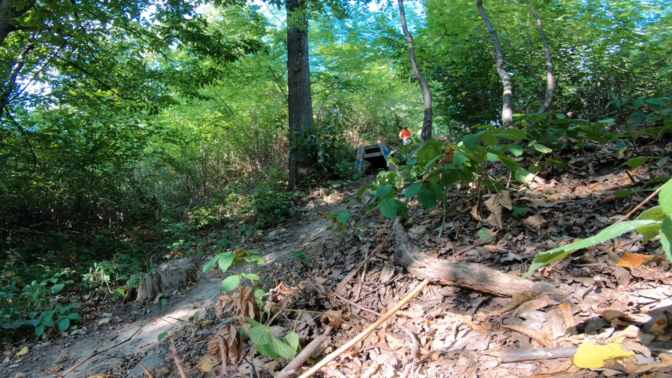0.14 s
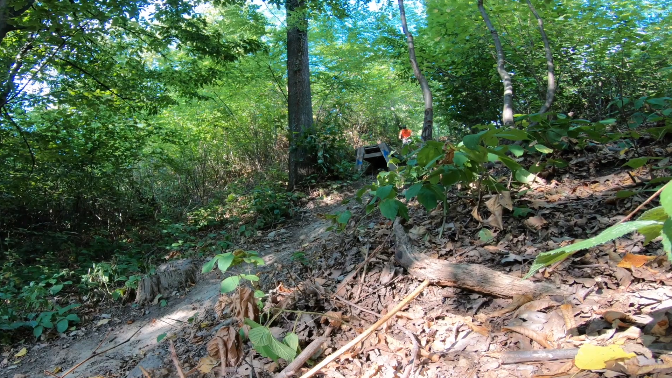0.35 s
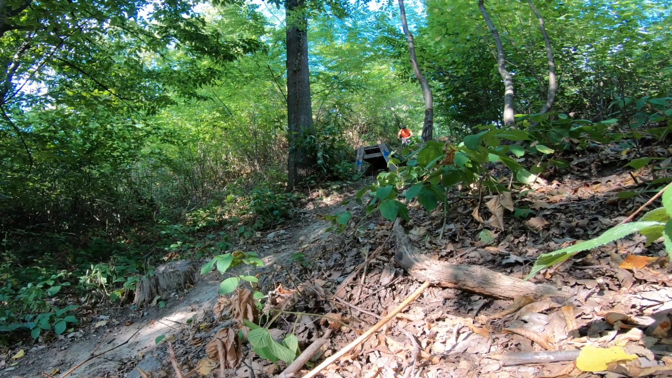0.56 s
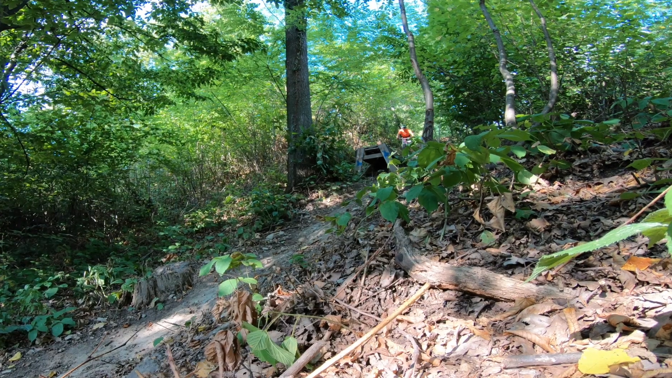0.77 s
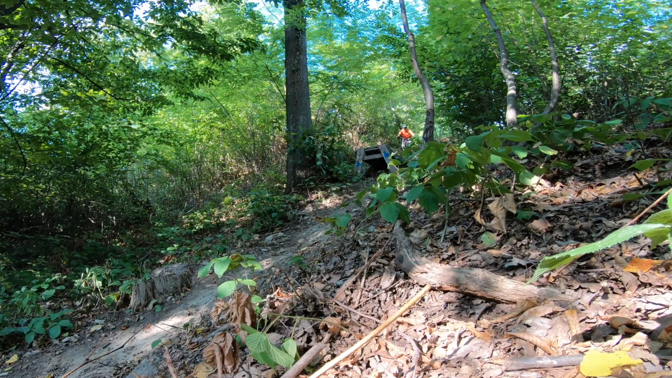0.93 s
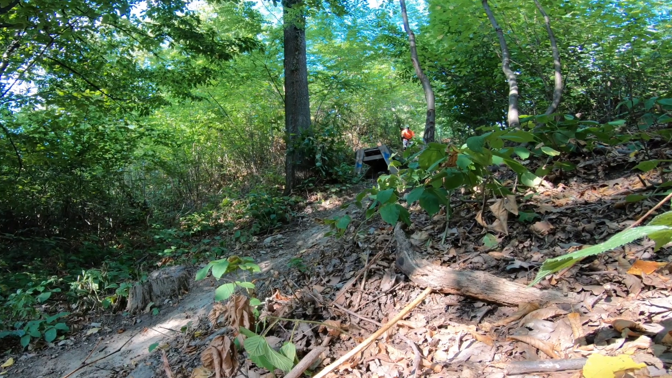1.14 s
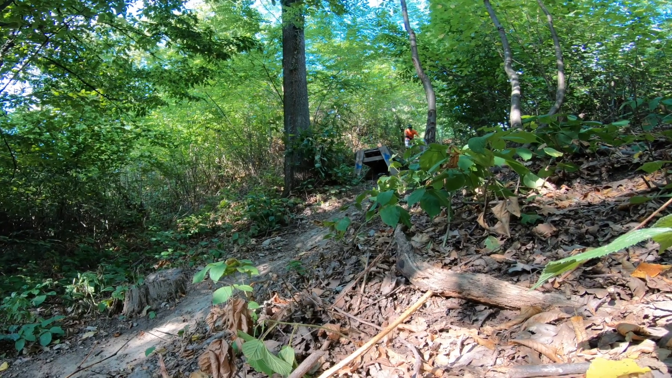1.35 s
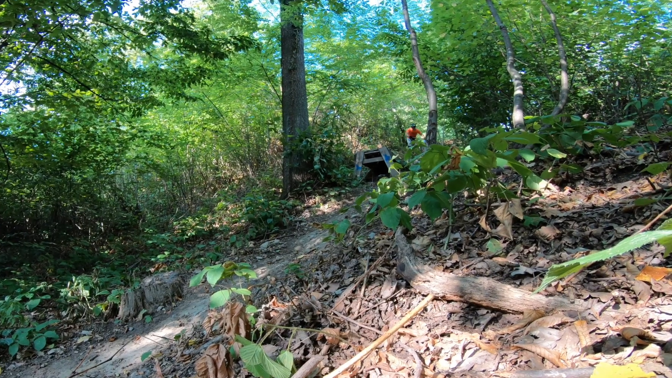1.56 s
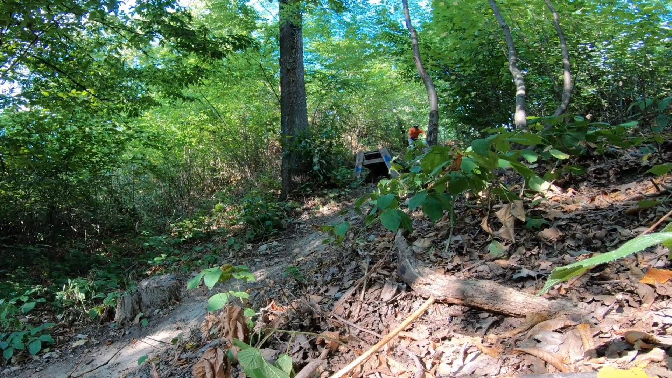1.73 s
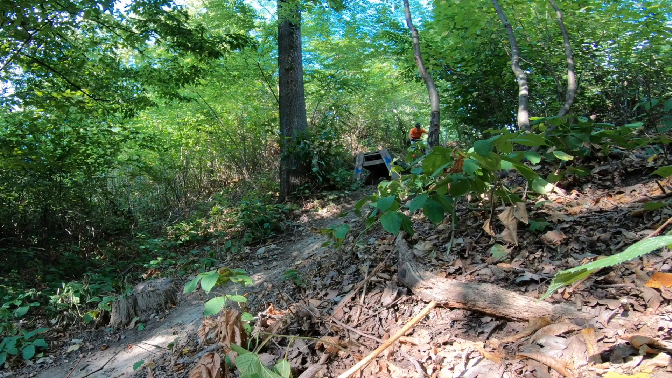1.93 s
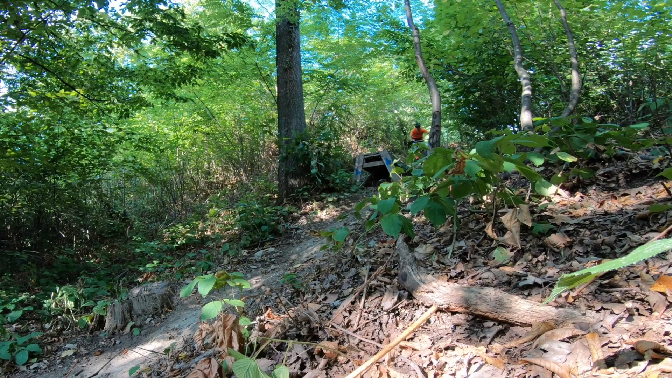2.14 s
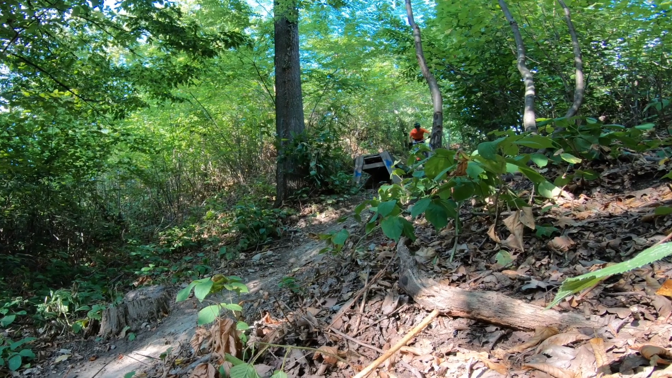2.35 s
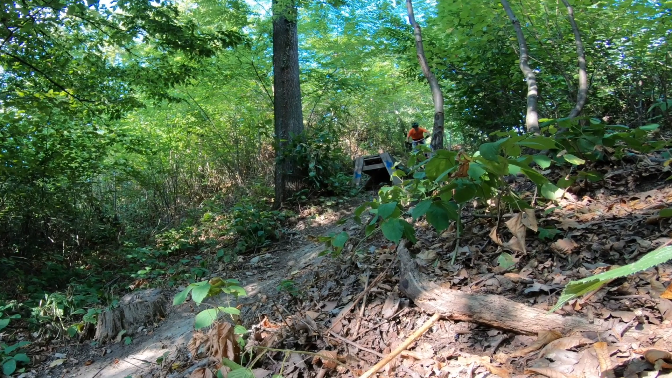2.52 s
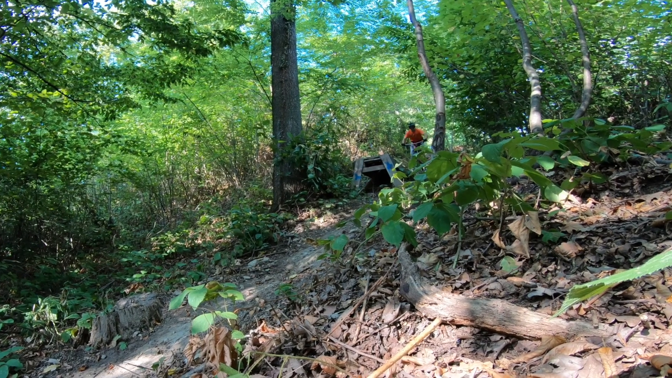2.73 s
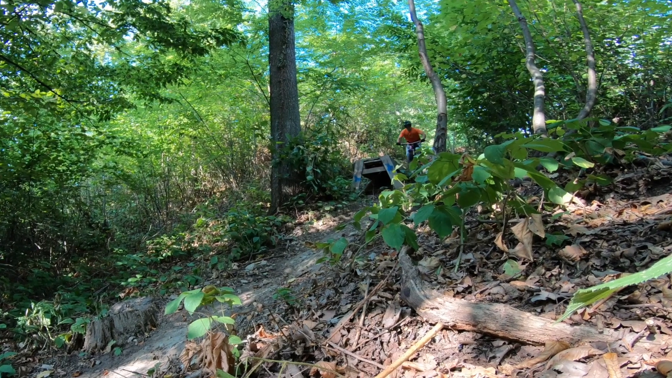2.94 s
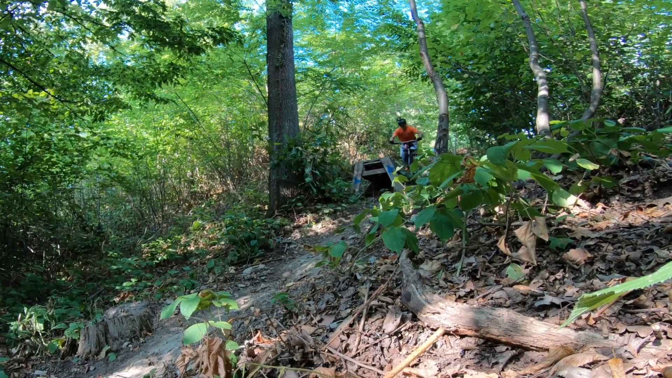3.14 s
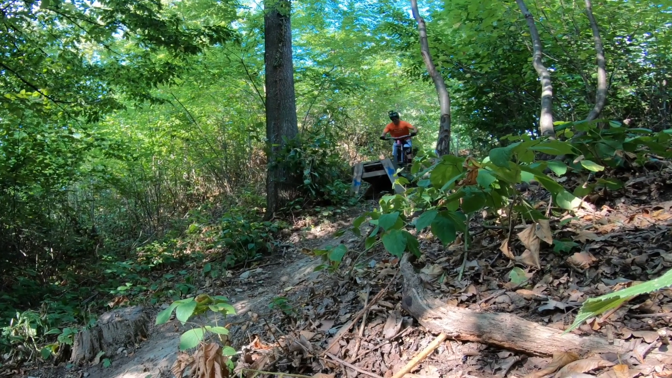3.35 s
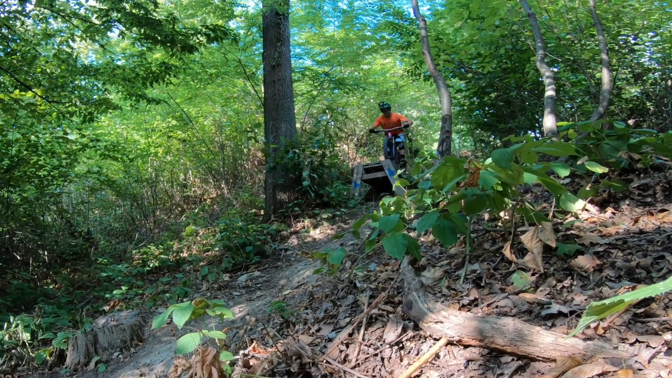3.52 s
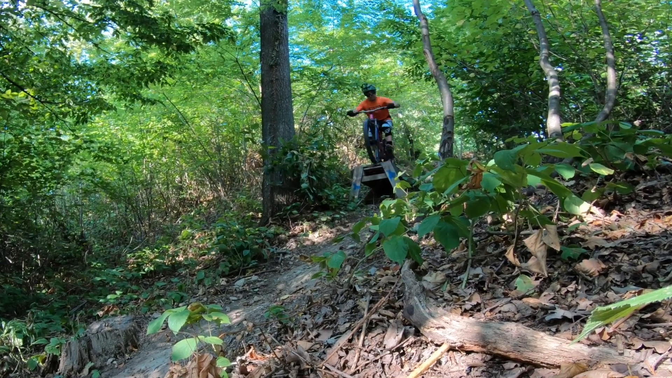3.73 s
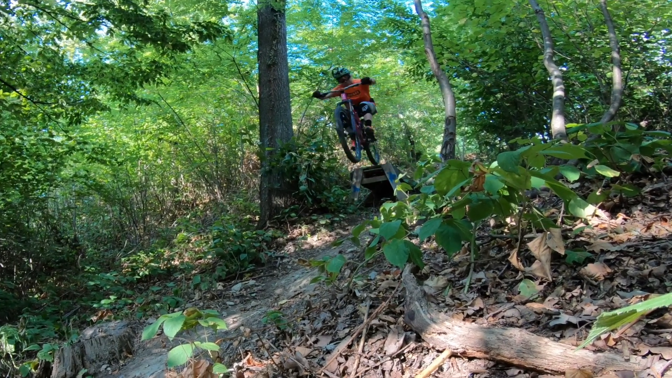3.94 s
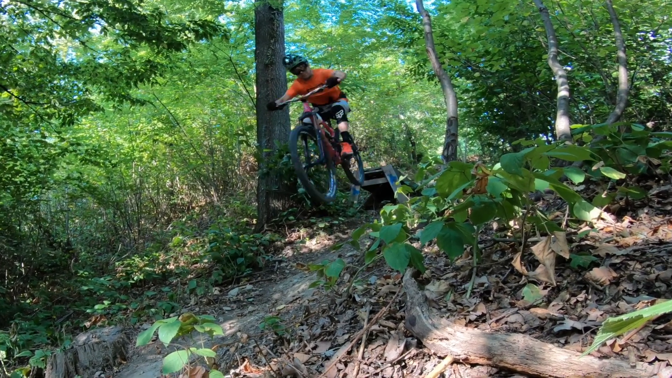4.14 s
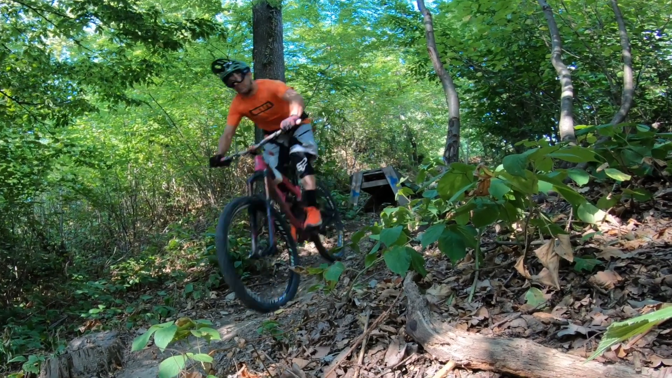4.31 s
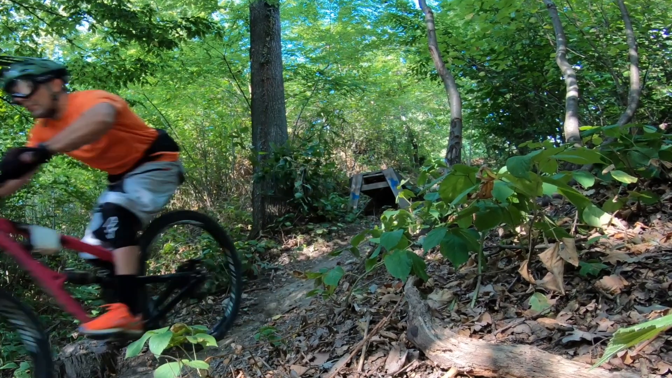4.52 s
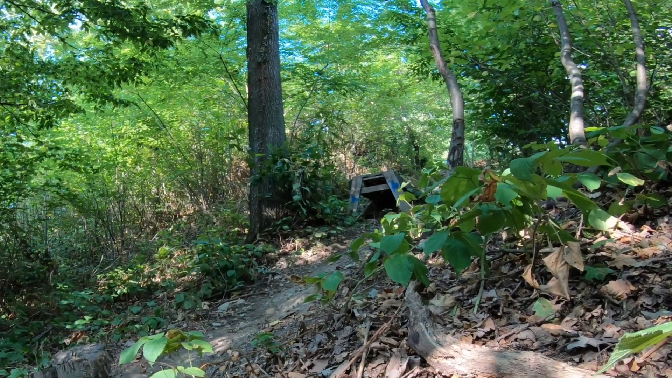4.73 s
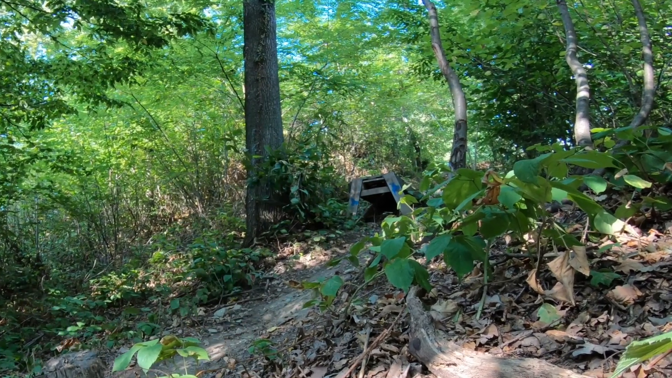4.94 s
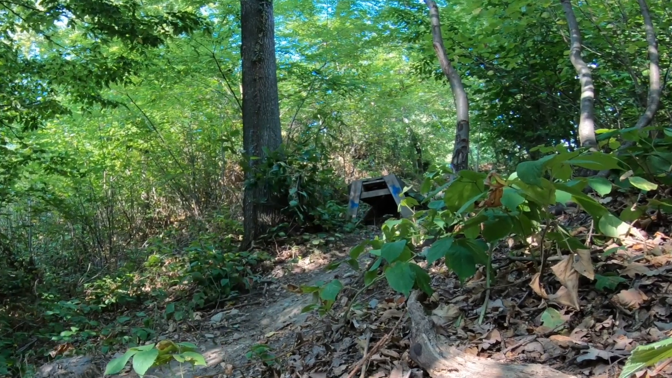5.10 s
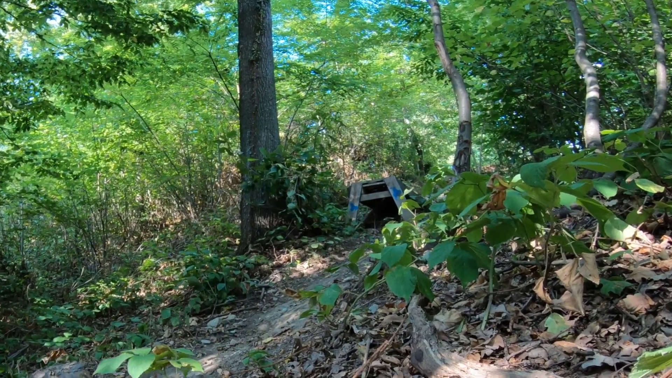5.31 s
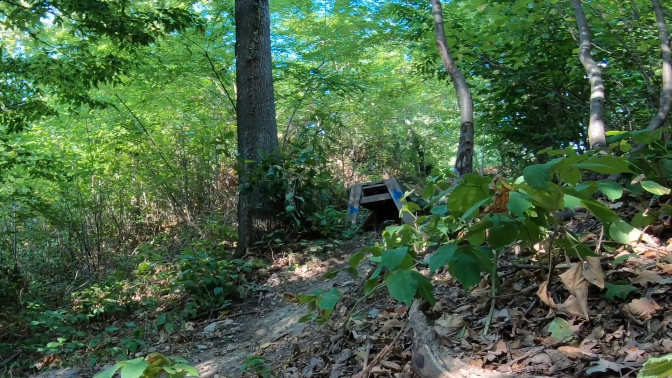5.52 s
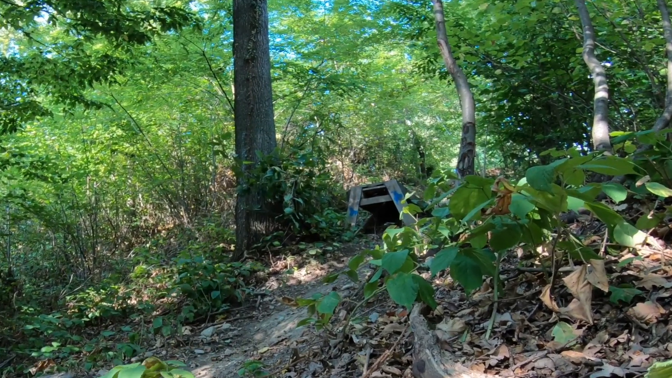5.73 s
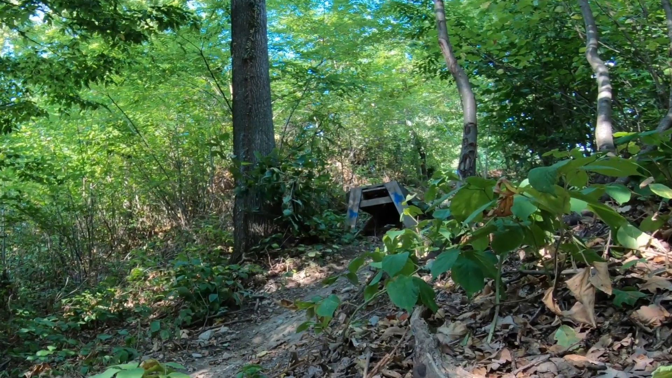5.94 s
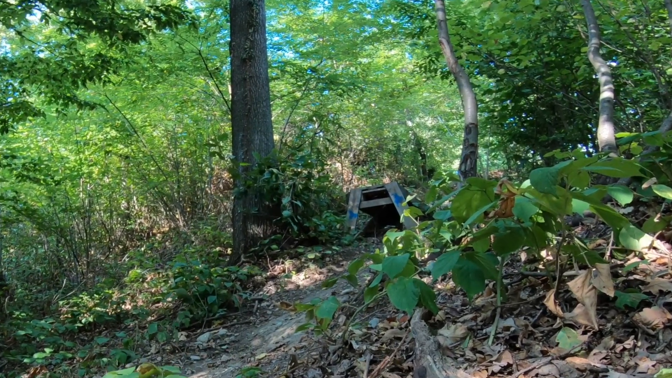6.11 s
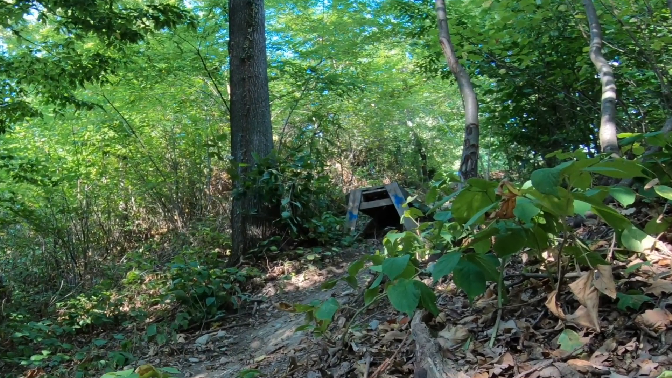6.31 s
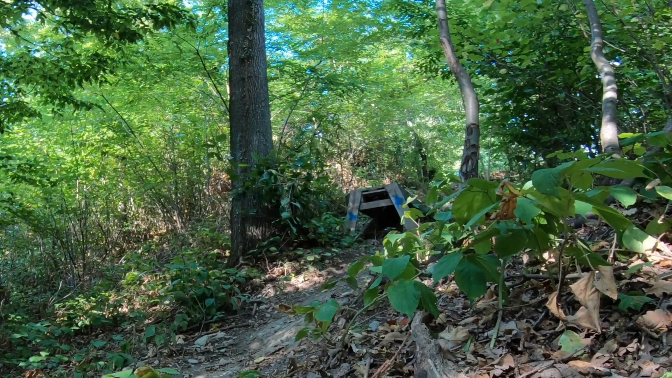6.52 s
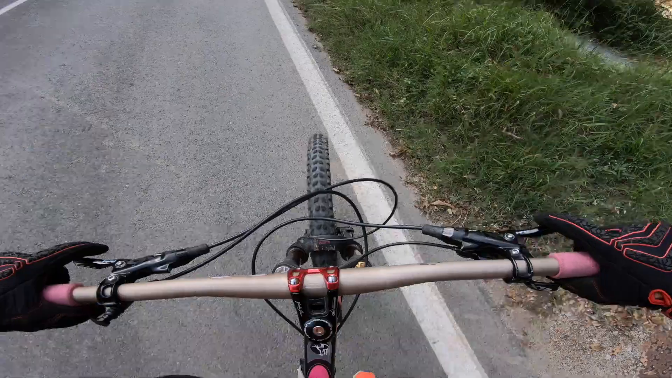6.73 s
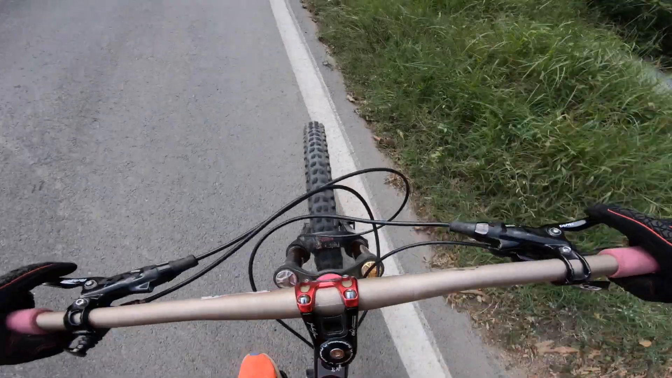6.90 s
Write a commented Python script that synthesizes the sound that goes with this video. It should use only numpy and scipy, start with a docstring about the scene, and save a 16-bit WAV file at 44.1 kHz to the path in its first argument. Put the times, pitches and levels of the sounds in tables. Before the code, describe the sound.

A mountain bike nears over dry leaves, rumbles across a wooden ramp, lands with a crackling thump, rolls off left; brief silence, wind, one sharp clack.

```python
"""A leafy dirt trail: a mountain bike nears, rumbles over a wooden ramp, flies, lands and rolls off to the left
of a small camera on the ground. Noise grains through resonances make grit, soil, leaves, tyres and ground;
struck modes thump; short coloured bursts make snaps, chain ticks and buzzes. A short silence, then a camera
on the handlebar fades in: filtered noise for wind and rattle, and one sharp clack of noise and a sine."""
import sys
import numpy as np
from scipy import signal
from scipy.fft import rfft, irfft
from scipy.io import wavfile
from scipy.ndimage import uniform_filter1d, map_coordinates

SR = 44100
rng = np.random.default_rng(int(sys.argv[2]) if len(sys.argv) > 2 else 0)


def log_audio(samples):
    """Write samples as a 16-bit WAV file to the path given in sys.argv[1]."""
    # one column per channel
    frames = np.atleast_2d(samples).T
    # limit to full scale, then quantise
    limited = np.clip(frames, -1, 1)
    pcm = np.round(limited * 32767).astype(np.int16)
    wavfile.write(sys.argv[1], SR, pcm)


N = 307200
TIME = np.arange(N) / SR
SPEED_M_S, PASSES_S, NEAREST_M = 4.16, 4.496, 1.29  # the bike's path past the camera
SMEAR_M = 4.0  # around this distance single cracks give way to an even rustle off the trees


def undb(db):
    """Decibels to gain."""
    return 10 ** (np.asarray(db) / 20)


def unit(x):
    """Scale to rms 1."""
    return x / np.sqrt(np.mean(x ** 2))


def columns(table):
    """A curve table read at every sample."""
    s, *rest = np.transpose(table)
    return np.array([np.interp(TIME, s, c) for c in rest])


def band(x, hz, width_hz):
    """Two-pole resonance, gain 1 at the centre."""
    return signal.lfilter(*signal.iirpeak(hz, hz / width_hz, SR), x)


def band_twice(x, hz, width_hz):
    """The same resonance twice, for steeper skirts."""
    return band(band(x, hz, width_hz), hz, width_hz)


def body(x, modes):
    """Sum of steep resonances at rms 1; alternating signs leave dark valleys between them."""
    total = 0
    for k, (hz, width_hz, db) in enumerate(modes):
        total = total + (-1) ** k * undb(db) * unit(band_twice(x, hz, width_hz))
    return unit(total)


def walk(rate_hz):
    """Random levels held 1 / rate_hz seconds, then slewed."""
    hold = int(SR / rate_hz)
    levels = rng.standard_normal(N // hold + 1)
    return uniform_filter1d(np.repeat(levels, hold), hold)[:N]


def grains(rate_hz, spread_db, tail_s, size=N):
    """Noise that flares at random uneven contacts; two rows, direct and scattered sound, share the flares."""
    hits = rng.random(size) < rate_hz / SR
    force = hits * undb(spread_db * np.minimum(rng.exponential(size=size), 4))
    flare = signal.lfilter([1], [1, -np.exp(-1 / (tail_s * SR))], force)
    return (flare + 1e-4) * rng.standard_normal((2, size))


def hump(s, rise_s, fall_s):
    """Gain 1 at s, 20 dB down rise_s before and fall_s after."""
    return undb(-20 * np.where(TIME < s, (s - TIME) / rise_s, (TIME - s) / fall_s))


def ring(s, db, hz, t60_s):
    """One decaying mode struck at s."""
    t = np.maximum(TIME - s, 0)
    return undb(db) * np.sin(2 * np.pi * hz * t) * np.exp(-np.log(1000) * t / t60_s)


def add(out, s, db, hz, treble_db, force, narrow, wide_db, low_db):
    """Colours a burst of force and lays it in at s with its direct peak at db."""
    pitch = (hz, narrow * hz, 0)
    edge = (6300, 5000, treble_db)
    broad = (0.5 * hz + 700, 0.63 * hz + 900, wide_db)
    knock = (480, 500, low_db)
    x = body(force, [pitch, edge, broad, knock])
    i = int(s * SR)
    out[:, i:i + x.shape[1]] += undb(db) * x / np.abs(x[0]).max()


def distance():
    """Metres along the trail from the nearest point, and metres to the camera."""
    along_m = SPEED_M_S * (TIME - PASSES_S)
    return along_m, np.hypot(along_m, NEAREST_M)


def far_share():
    """Near 0 close to the camera, towards 1 where the trees scatter most of the sound."""
    return 1 / (1 + (SMEAR_M / distance()[1]) ** 4)


def smear(cracks):
    """Near cracks stand alone; far ones blur into steady noise."""
    far = far_share()
    return np.sqrt(1 - far) * unit(cracks) + np.sqrt(far) * rng.standard_normal(cracks.shape)


def rolling():
    """Gains of grit, soil, leaves, ring and thud: each stretch eases in, weaker by 1 / distance."""
    # What the wheels roll on: bushes, smooth dirt, rougher dirt, ramp foot, planks, lip, air, landing,
    # run-out, loose soil, firmer ground, bend.
    # Each row: start in seconds, then grit, soil, leaves, tyre ring and ground thud at 1 m, all in dB.
    stretches = [(0, -67, -102, -88, -49.5, -52.5), (1.8, -57, -59, -56, -57, -82.5),
                 (2.45, -47, -51, -49, -44, -58), (3.13, -44, -47.5, -47.5, -42.5, -51),
                 (3.42, -43, -52, -46.5, -39, -40), (3.78, -49.5, -50.5, -50, -45.5, -48),
                 (3.927, -77, -75, -55, -58, -61), (4.261, -30, -33.5, -38, -31, -28),
                 (4.64, -37.5, -38.5, -40, -33, -30), (5.33, -32.5, -31, -35, -27, -38),
                 (5.96, -36.5, -34.5, -35, -28, -33), (6.2, -38.5, -56, -38.5, -47, -48)]
    ease_s = 0.026
    s, *db = np.transpose(stretches)
    row = np.maximum(np.searchsorted(s, TIME, side="right") - 1, 0)
    steps = undb(db)[:, row]
    keep = np.exp(-1 / (ease_s * SR))
    return signal.lfilter([1 - keep], [1, -keep], steps) / distance()[1]


def crunch():
    """Grit, soil and dry leaves break under the knobs; a patchy trail shakes all three together."""
    # Resonances of each material. Each row: centre in Hz, width in Hz, level in dB.
    grit_modes = [(2220, 2200, 2), (3400, 2550, 0)]
    soil_modes = [(530, 980, -2.5), (776, 188, -0.5), (1514, 2340, 2)]
    leaf_modes = [(4100, 4450, -1), (7370, 2340, 1.5), (9750, 1830, -5), (13600, 4700, -13)]
    # The crunch swells and fades. Each row: peak in seconds, rise and fall in seconds per 20 dB,
    # grit level in dB, soil re grit in dB.
    swells = [(0.02, 0.18, 0.071, -67, -12), (0.78, 0.74, 0.099, -59, 5.5), (0.509, 0.0066, 0.68, -59, -30),
              (0.629, 0.0048, 0.33, -59, -9), (0.74, 0.095, 0.1, -54, -20), (1.498, 0.019, 1, -53, -6.5),
              (1.44, 0.076, 0.21, -75.5, 15), (1.655, 0.027, 0.08, -50, -5), (2.15, 0.36, 0.18, -67.5, -14),
              (2.86, 0.011, 0.098, -56, -5), (4.218, 0.28, 1, -49, -18.5), (5.012, 0.015, 0.13, -35, -32)]
    leaves_re_grit_db, leaf_trade = -11, 0.24  # trade: dB of leaves gained per dB of soil lost
    swell_gain = 0
    for s, rise_s, fall_s, db, soil_db in swells:
        leaves_db = leaves_re_grit_db - leaf_trade * soil_db
        swell_gain = swell_gain + hump(s, rise_s, fall_s) * undb([[db], [db + soil_db], [db + leaves_db]])
    gain = rolling()[:3] + swell_gain
    patch = walk(22) * (1 - far_share())
    pebbles = grains(1100, spread_db=2.5, tail_s=.004)
    clods = grains(420, spread_db=3.4, tail_s=.003)
    flakes = grains(4000, spread_db=1.2, tail_s=.004)
    grit = body(smear(pebbles), grit_modes) * undb(2.4 * patch + 0.8 * walk(25))
    soil = body(clods, soil_modes) * undb(0.73 * patch + 0.53 * walk(12))
    leaves = body(flakes, leaf_modes) * undb(0.51 * patch + 1.4 * walk(53))
    return gain[0] * grit + gain[1] * soil + gain[2] * leaves


def wheels():
    """Bumps ring the air in the tyres and shake the soil; hard strikes thump."""
    # Casing and planks, then ground resonances. Each row: centre in Hz, width in Hz, level in dB.
    tyre_modes = [(179.3, 99, -0.5), (275, 222, -2.5), (397, 65, -6), (498, 450, -9)]
    ground_modes = [(28, 18, -9), (49.4, 11, -7), (94, 109, 0), (137, 70, -7)]
    # Bumps load the wheels. Each row: time in seconds, tyre ring in dB, ground thud in dB.
    bumps = [(0.39, -60, -59.5), (1.15, -88, -65), (1.629, -45.5, -74), (1.99, -60.5, -79.5),
             (2.7, -91, -57), (3.168, -54, -66), (3.39, -75, -51.5), (3.44, -63, -68), (3.519, -54, -68),
             (3.59, -43, -79), (3.66, -42, -68), (3.72, -49, -63), (4.34, -29, -31), (4.59, -35, -49),
             (4.82, -42.5, -37.5), (4.931, -41, -39.5), (5.31, -40, -44), (5.898, -46, -75),
             (6.27, -88, -43), (6.48, -54, -52), (6.658, -66, -62)]
    # Wheels strike the ground, and at 3.433 s a ramp plank.
    # Each row: time in seconds, level in dB, pitch in Hz, t60 in seconds.
    thumps = [(4.271, -10, 53, 0.14), (4.298, -18, 60.5, 0.27), (3.433, -34, 190, 0.14),
              (4.729, -22.5, 43, 0.31), (4.799, -22, 51.3, 0.16), (4.922, -28, 44, 0.25)]
    rise_s, fall_s = 0.065, 0.072  # per 20 dB
    air_hz, air_width_hz, air_db = 233.5, 22.7, -3  # air inside the tyres
    load = rolling()[3:] + sum(hump(s, rise_s, fall_s) * undb([[ring_db], [thud_db]])
                               for s, ring_db, thud_db in bumps)
    tyre = body(grains(350, spread_db=1.5, tail_s=0.0052), tyre_modes) * load[0]
    push = rng.standard_normal((2, N))
    air = band_twice(push * load[0], air_hz, air_width_hz)  # loaded before the filter: rings on after the bump
    tyre += undb(air_db) * air / band_twice(push, air_hz, air_width_hz).std()
    ground = body(grains(120, spread_db=-2.0, tail_s=0.02), ground_modes) * load[1]
    direct_only = np.array([[1], [0]])
    return tyre + ground + direct_only * sum(ring(*row) for row in thumps)


def snaps(tail_s=0.023, tail_db=-4.0):
    """Twigs and clods break: ragged runs of cracks, each with a strong tail gone in a few hundredths of a second."""
    # Each row: start in seconds, direct peak in dB, pitch in Hz, length in seconds.
    snap_rows = [(0.332, -51, 1290, 0.036), (1.082, -55.5, 1230, 0.023), (1.588, -31.5, 1100, 0.062),
                 (1.955, -47.5, 860, 0.039), (1.973, -42.5, 1190, 0.038), (3.135, -40.5, 330, 0.021),
                 (4.261, -13.5, 1980, 0.031), (4.302, -26.5, 457, 0.052), (4.306, -14.5, 4700, 0.024),
                 (4.341, -12, 5300, 0.0034), (4.495, -15.5, 2400, 0.019), (4.516, -9.5, 2400, 0.01),
                 (4.578, -25, 490, 0.022), (4.599, -4, 1760, 0.019), (4.668, -11, 1790, 0.024),
                 (4.705, -17, 2160, 0.014), (4.725, -22, 604, 0.0099), (4.757, -29.5, 900, 0.014),
                 (4.8, -18.5, 1330, 0.03), (4.837, -24.5, 660, 0.012), (4.909, -19.5, 482, 0.026),
                 (5.204, -26, 2190, 0.024), (5.278, -30, 860, 0.017), (5.397, -25.5, 670, 0.031),
                 (5.499, -30, 870, 0.015), (5.594, -28, 607, 0.024), (5.649, -26.5, 600, 0.02),
                 (5.873, -28, 2100, 0.017), (5.905, -28.5, 825, 0.014)]
    out, t = np.zeros((2, N + 8192)), np.arange(8192) / SR
    for s, db, hz, length_s in snap_rows:
        onset = t / (t + 0.075 * length_s)
        shape = onset * (np.exp(-(t / length_s) ** 4) + undb(tail_db) * np.exp(-t / tail_s))
        force = shape * grains(4500, spread_db=2.5, tail_s=0.00031, size=8192)
        add(out, s, db, hz, -18.5, force, narrow=0.92, wide_db=-7.5, low_db=-6.0)
    return out[:, :N]


def ticks(click_s=0.00015, tail_db=-24):
    """Chain and pebbles tick on metal: a hard click, then a rattle that dies away."""
    # Each row: start in seconds, direct peak in dB, pitch in Hz, treble in dB.
    tick_rows = [(0.246, -50, 1270, -39), (0.288, -40, 1120, -30), (0.384, -39, 1300, -28),
                 (0.402, -37, 1200, -9), (0.461, -42, 1230, -30), (0.487, -44, 1290, -30),
                 (0.506, -42, 2770, -11), (0.553, -35, 1400, -7), (0.601, -49, 1500, -30),
                 (0.624, -43, 2860, -6), (1.41, -54, 830, -28), (1.439, -46.5, 850, -31),
                 (1.55, -36, 585, -30), (1.498, -32.5, 3080, -17), (1.619, -27, 990, -44),
                 (2.105, -43.5, 3130, -4), (2.166, -36, 2540, -4), (2.317, -43, 3220, -12),
                 (2.372, -50, 3700, -20), (2.487, -42, 695, -16), (2.492, -38.5, 1430, -3),
                 (2.683, -36, 7200, 6), (2.852, -45, 800, -30), (3.212, -32.5, 2860, -9),
                 (4.2769, -10.5, 2870, -31), (4.4613, -7.5, 2850, -11), (4.514, -7.5, 1530, -3),
                 (4.549, -7, 2800, -2), (4.799, -14, 2300, -2), (4.895, -14, 3160, -3),
                 (5.01, -11.5, 3170, 15), (5.0795, -18, 970, -20), (5.132, -33, 3320, -21),
                 (5.2465, -28.5, 1500, -5), (5.3469, -22, 650, -29), (5.355, -16, 730, -38),
                 (5.841, -21.5, 1020, -32), (5.992, -34, 1310, -30), (6.034, -31.5, 1160, -18),
                 (6.1176, -31, 1310, -16), (6.347, -31, 2700, -30), (6.372, -33.5, 2400, -26),
                 (6.4862, -27.5, 2830, -18), (6.667, -26, 3000, -37)]
    t60_s, t60_s_per_m = 0.035, 0.012  # farther ticks trail longer among the trees
    metres = distance()[1]
    out, t = np.zeros((2, N + 8192)), np.arange(8192) / SR
    for s, db, hz, treble_db in tick_rows:
        decay_s = t60_s + t60_s_per_m * metres[int(s * SR)]
        fade = undb(tail_db) * np.exp(-np.log(1000) * t / decay_s)
        rattle = fade * rng.standard_normal((2, len(t)))
        signs = np.array([np.ones(len(t)), np.sign(rattle[1])])  # scattered click has random signs
        click = np.exp(-t / click_s) * signs
        add(out, s, db, hz, treble_db, click + rattle, narrow=480 / hz, wide_db=6.5 - 0.0051 * hz, low_db=-49.0)
    return out[:, :N]


def buzzes():
    """The drivetrain buzzes: small rattles in three resonances that start at once and fade."""
    # Each row: start in seconds, length in seconds, level before the fade in dB, pitch in Hz.
    buzz_rows = [(0.496, 0.13, -54.5, 2750), (0.619, 0.14, -47.5, 2850), (1.496, 0.092, -56, 2860),
                 (4.357, 0.02, -26, 2880), (4.394, 0.12, -29.5, 1910), (5.029, 0.049, -35, 1990),
                 (5.507, 0.018, -33.5, 2780), (5.56, 0.011, -31.5, 2610), (5.591, 0.04, -36, 2630),
                 (5.65, 0.085, -39.5, 2750), (5.802, 0.085, -41.5, 2670), (6.481, 0.049, -40.5, 2830),
                 (6.669, 0.075, -49, 2980)]
    # Other resonances. Each row: share of the pitch (ratio), level in dB.
    partners = [(0.64, -12), (1.54, -12)]
    rate_hz, width_hz = 500, 490
    out, t = np.zeros((2, N + 16384)), np.arange(16384) / SR
    for s, length_s, db, hz in buzz_rows:
        modes = [(hz, width_hz, 0)] + [(share * hz, width_hz, rel_db) for share, rel_db in partners]
        knock = np.exp(-t / 0.0021) * rng.standard_normal((2, len(t)))  # sets it off
        rattles = grains(rate_hz, spread_db=-1.5, tail_s=0.0033, size=16384)
        x = body(rattles + 2.6 * knock, modes)
        i = int(s * SR)
        out[:, i:i + len(t)] += undb(db) * x * np.exp(-(t / length_s) ** 1.1) * np.minimum(t / 0.0032, 1)
    return out[:, :N]


def handlebar(rise_s=0.00071, fall_s=0.0022, tail_s=0.011, tail_db=-10.5):
    """Wind rumble and mount rattle swell in; a part clacks against the bar and shivers on."""
    # Each row: time in seconds, wind rumble in dB, rattle in dB.
    bar = [(6.78, -92, -101), (6.816, -41, -55.5), (6.966, -24, -39.5)]
    # The clack and the ticks that lead into it. Each row: time in seconds, level in dB.
    clack_rows = [(6.89, -22), (6.898, -18.5), (6.9015, -26), (6.9073, -27), (6.91, -5.5)]
    # Resonances of clack, wind and camera mount. Each row: centre in Hz, width in Hz, level in dB.
    clack_modes = [(2676, 1000, 2), (2900, 210, -2), (3530, 970, 2.5), (1820, 540, -5.5),
                   (4470, 510, -11.5), (905, 850, -9)]
    wind_modes = [(67, 80, 5), (206, 340, -12.5)]
    housing_modes = [(1180, 3750, 15.5), (3040, 3200, 13), (4700, 710, 0.5)]
    edge_hz, edge_width_hz, edge_peak_db = 7600, 1200, -19.5
    wind_db, rattle_db = columns(bar)
    wind = body(rng.standard_normal(N), wind_modes) * undb(wind_db)
    rattle = body(grains(1200, spread_db=3.0, tail_s=0.011)[0], housing_modes) * undb(rattle_db)

    def blow(s, decay_s):
        """One blow: steep rise to 1 at s, exponential decay."""
        return np.exp(-np.where(TIME < s, (s - TIME) / rise_s, (TIME - s) / decay_s))

    blows = sum(undb(db) * (blow(s, fall_s) + undb(tail_db) * blow(s, tail_s)) for s, db in clack_rows)
    tone = 2.8 * blows ** 2 * np.sin(2 * np.pi * clack_modes[0][0] * TIME)
    clack = body(blows * rng.standard_normal(N) + tone, clack_modes)
    edge = band(blows ** 3 * rng.standard_normal(N), edge_hz, edge_width_hz)  # cubed: favours the hardest blow
    return ((wind + rattle) * (TIME > bar[0][0]) + clack * blows.max() / np.abs(clack).max()
            + edge * undb(edge_peak_db) / np.abs(edge).max())


def hum():
    """A faint steady hum far off and the even hiss of the trees: filtered noise."""
    # Resonances of hum and trees. Each row: centre in Hz, width in Hz, level in dB.
    hum_modes = [(170, 58, -5.5), (69.5, 27, -11.5), (30, 25, -12.5)]
    wood_modes = [(910, 860, -7), (3350, 1400, -5.5), (4420, 1100, -4), (7300, 980, -4.5)]
    hum_db, woods_db = -65.5, -71
    low, high = rng.standard_normal((2, 2, N))
    return undb(hum_db) * body(low, hum_modes) + undb(woods_db) * body(high, wood_modes)


def ports(sound):
    """Two close ports: lag and midrange follow the source's side; scattered sound differs, most in the treble."""
    # Share of sound that reaches the ports unlike. Each row: frequency in Hz, level in dB.
    apart = [(60, -14), (350, -17.5), (750, -3), (1500, -6), (2800, -39), (4300, -12.5), (6000, -0.5),
             (8500, 1), (15000, -2.5)]
    lag_per_db = .17  # samples that the far port lags per dB of level difference
    ahead_db, swing_db = 6.5, 12  # left minus right halfway across, and its swing to either side
    turned_m = 0.5  # the camera is turned: the pan is halfway this far past the nearest point
    scatter_db, scatter_slope = -8, 0.7  # scattered share at 1 m; dB gained per dB of distance
    detour = 12  # samples by which scattered sound is later at the right port
    port_db, dip_hz, dip_width_hz, dip_db = -0.9, 4600, 1500, -3.2  # left port against right
    direct, scattered = sound
    along_m, metres = distance()
    pan_db = ahead_db + swing_db * np.tanh(1.01 * (along_m - turned_m) / NEAREST_M)
    far_db = scatter_db + scatter_slope * 20 * np.log10(metres)
    sign = np.array([[1], [-1]])
    lean_db = sign * pan_db / 2

    # only long waves bend round the body
    low = signal.sosfiltfilt(signal.butter(2, 4200., fs=SR, output="sos"), direct)
    lagged = np.array([map_coordinates(low, [np.arange(N) + lag_per_db * db], order=3) for db in lean_db])
    near = direct - low + lagged
    # the camera body shades this range
    shaded = signal.sosfiltfilt(signal.butter(1, [600., 2400.], "bandpass", fs=SR, output="sos"), near)

    hz = np.fft.rfftfreq(N, 1 / SR)
    apart_hz, apart_db = np.transpose(apart)
    side_gain = undb(np.interp(np.log(hz + 1), np.log(apart_hz), apart_db))
    side = irfft(rfft(scattered) * side_gain, N)
    low_side = signal.sosfilt(signal.butter(2, 6000., fs=SR, output="sos"), side) * undb(far_db)
    high_side = signal.sosfilt(signal.butter(2, 5500., "highpass", fs=SR, output="sos"), side)
    low_pair = np.array([low_side, -np.roll(low_side, detour)])

    both = near + shaded * (undb(lean_db) - 1) + sign * high_side + low_pair
    both = both + band(both, dip_hz, dip_width_hz) * (undb(sign * dip_db / 2) - 1)
    return both * undb(sign * port_db / 2)


def scene():
    """The trail until the cut, then the handlebar in the centre."""
    cut_s = 6.743
    trail = ports(crunch() + ticks() + snaps() + buzzes() + wheels() + hum())
    return trail * np.clip((cut_s - TIME) / .008, 0, 1) + handlebar()


def record(dry):
    """The microphone dulls the highest treble, the camera rounds the loudest peaks and cuts the top."""
    mic_hz, top_hz = 11600, 15500
    dull = signal.sosfilt(signal.butter(2, mic_hz, fs=SR, output="sos"), dry)
    rounded = np.tanh(1.16 * dull) / 1.476
    return signal.sosfilt(signal.ellip(8, .2, 70, top_hz, fs=SR, output="sos"), rounded)


dry = scene()
out = record(dry)
log_audio(out)
```